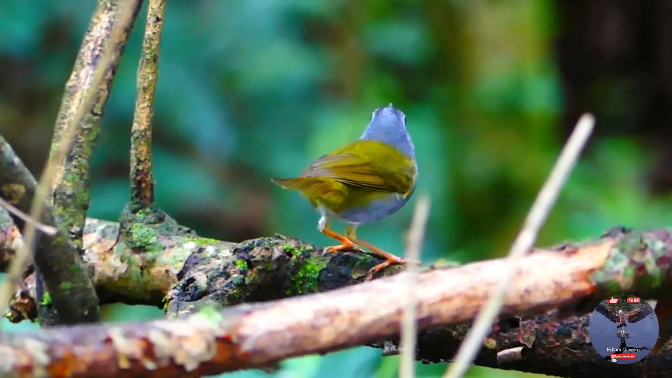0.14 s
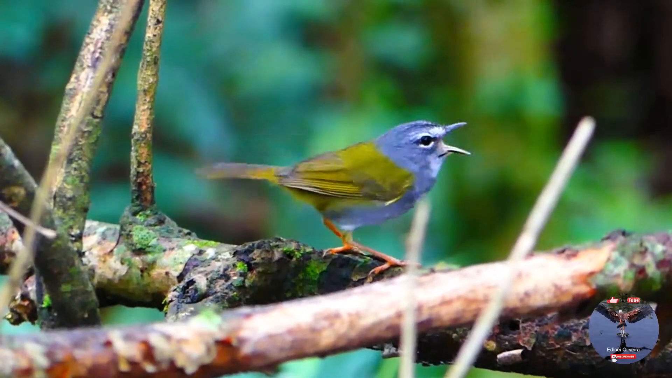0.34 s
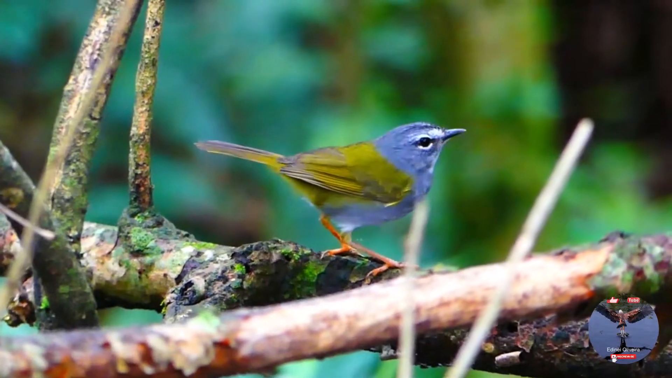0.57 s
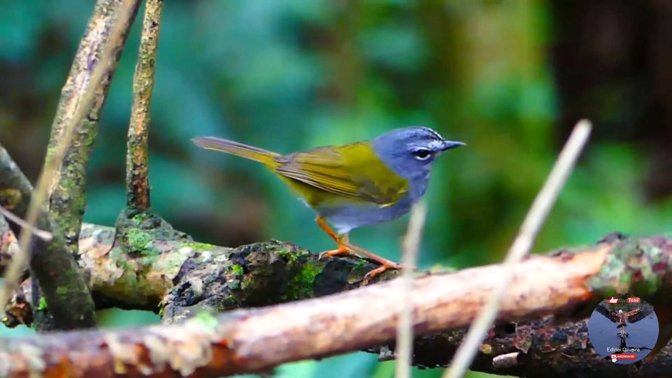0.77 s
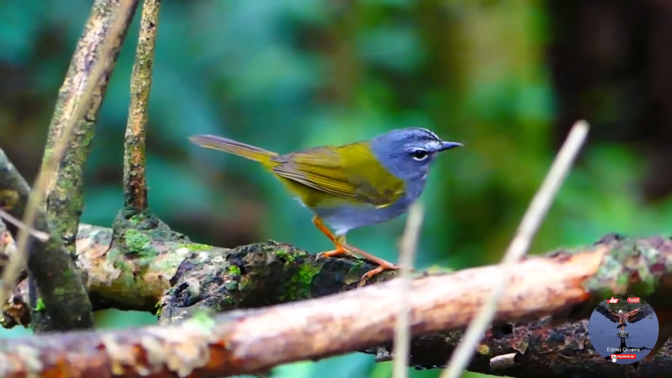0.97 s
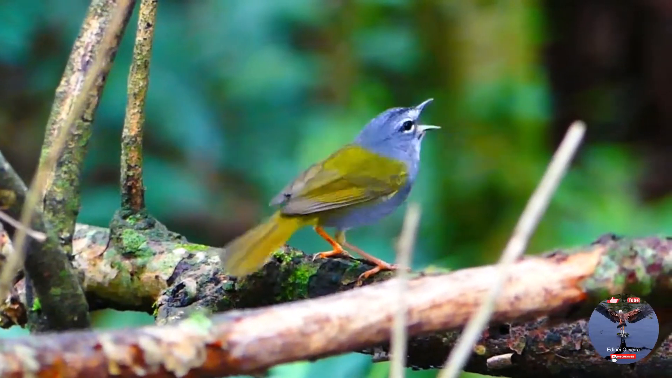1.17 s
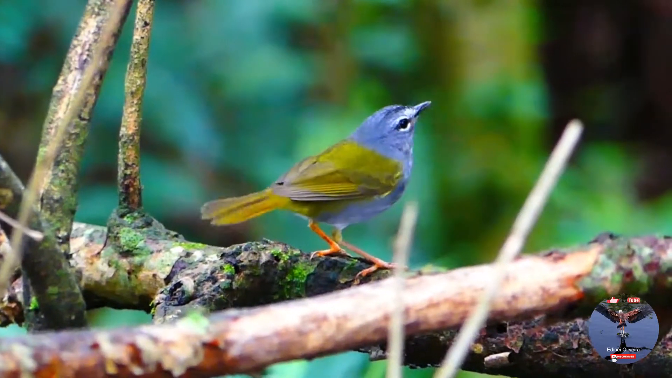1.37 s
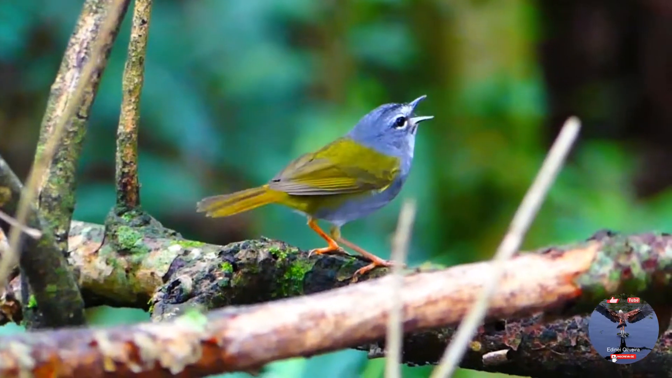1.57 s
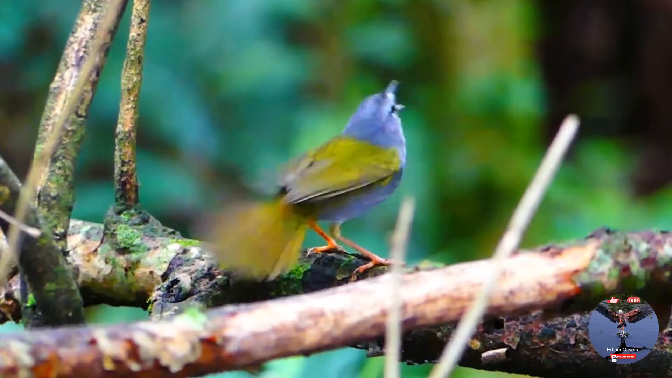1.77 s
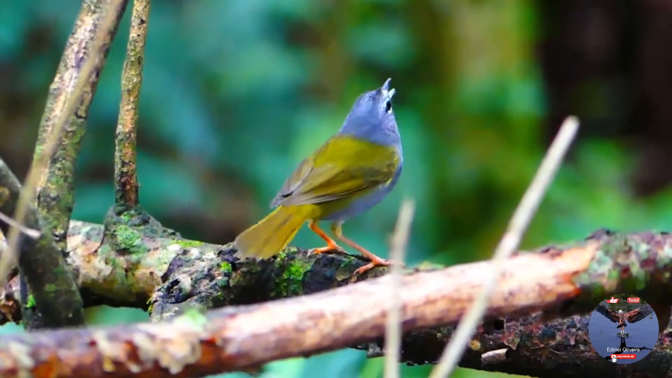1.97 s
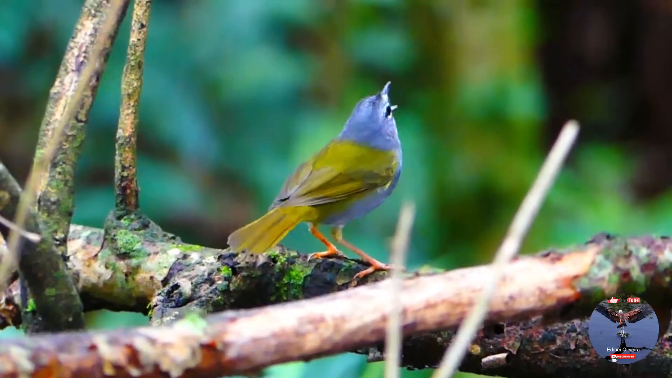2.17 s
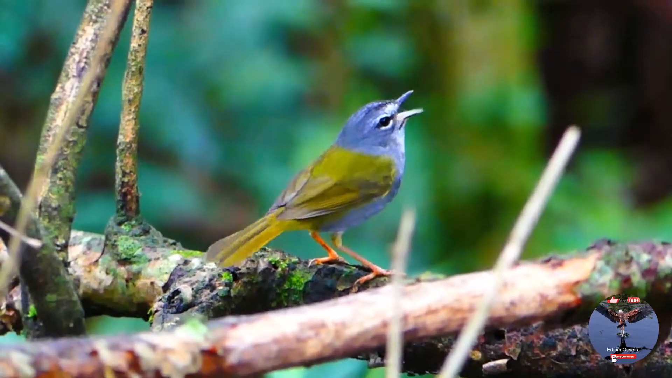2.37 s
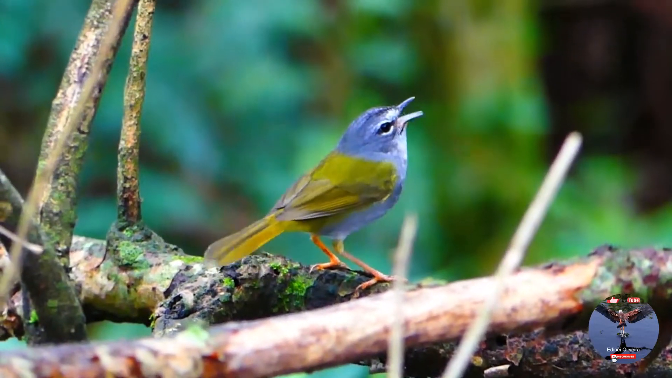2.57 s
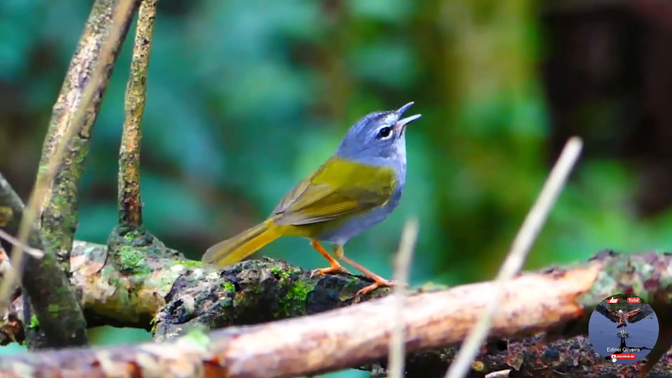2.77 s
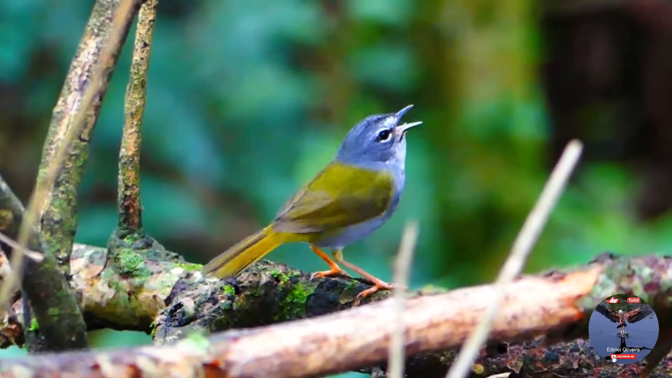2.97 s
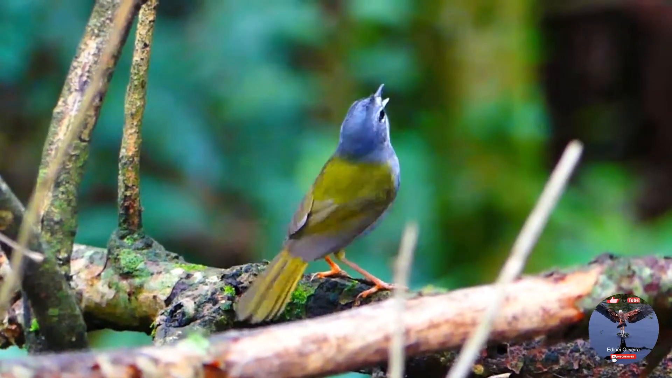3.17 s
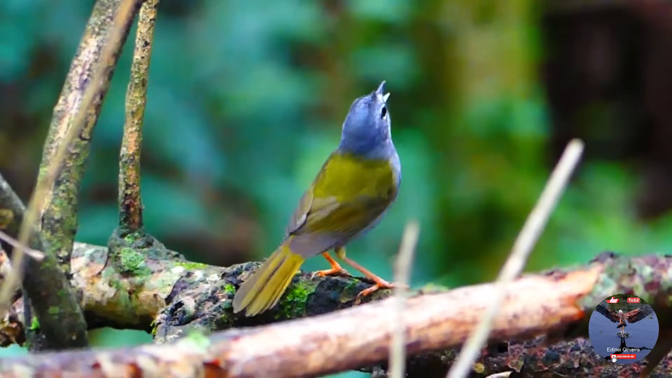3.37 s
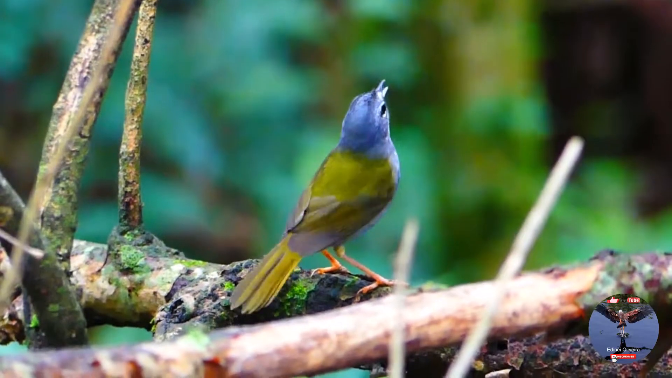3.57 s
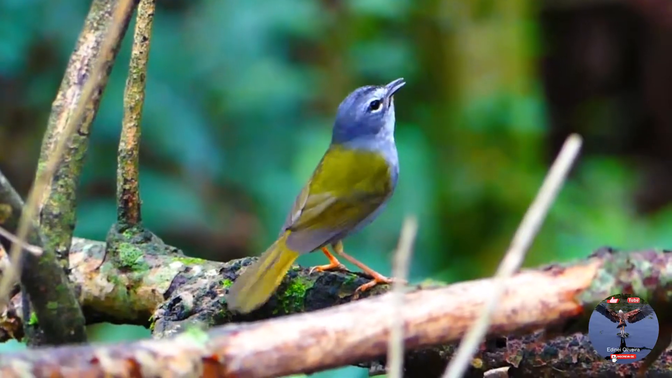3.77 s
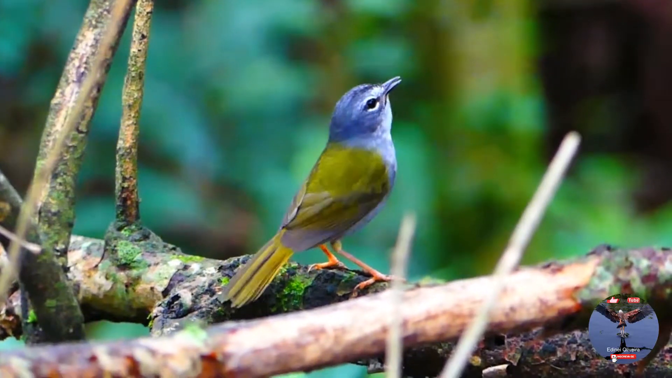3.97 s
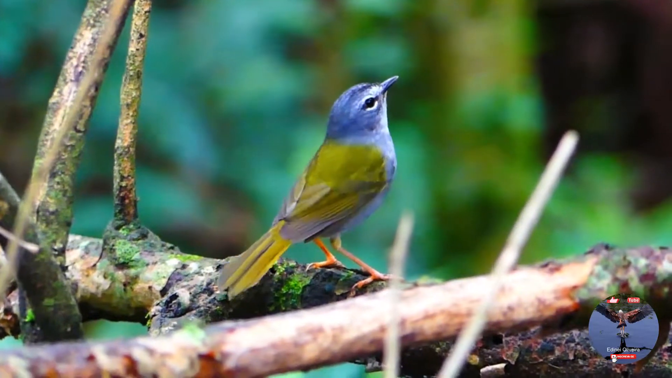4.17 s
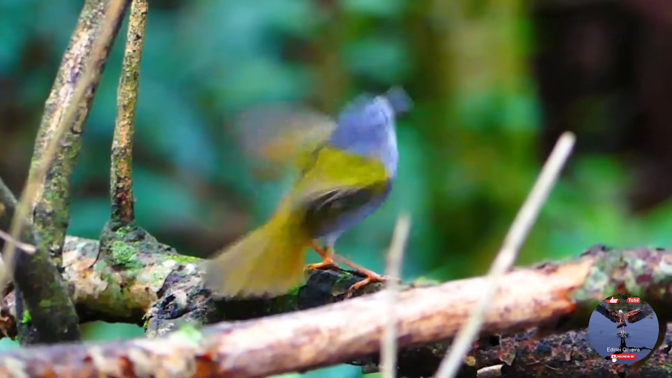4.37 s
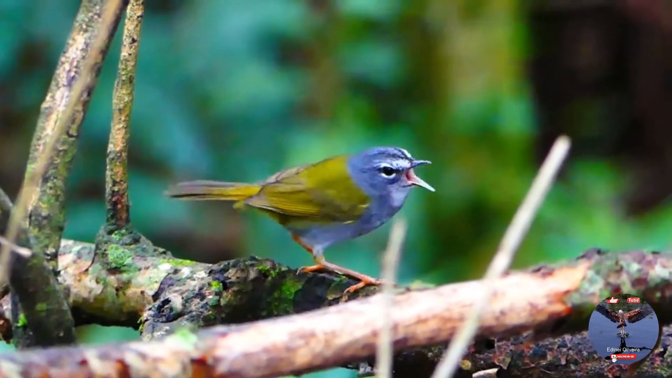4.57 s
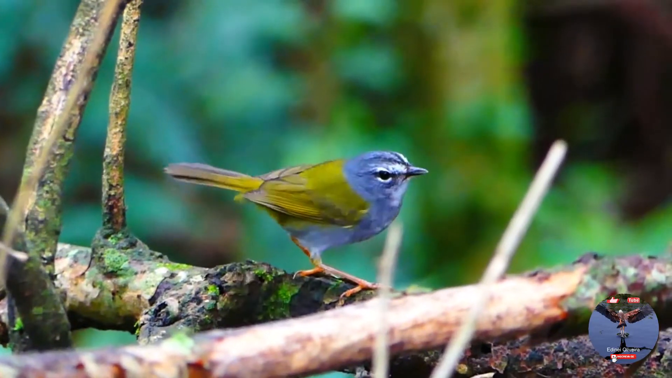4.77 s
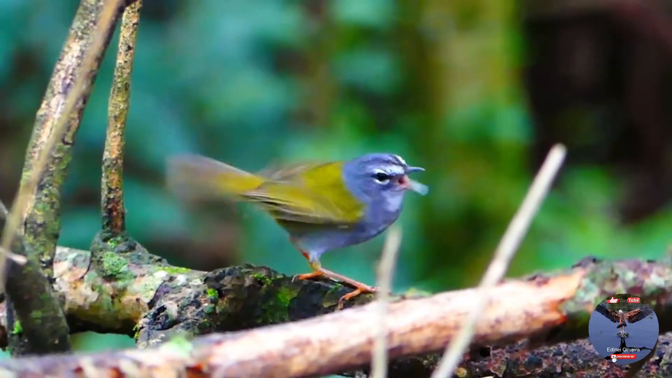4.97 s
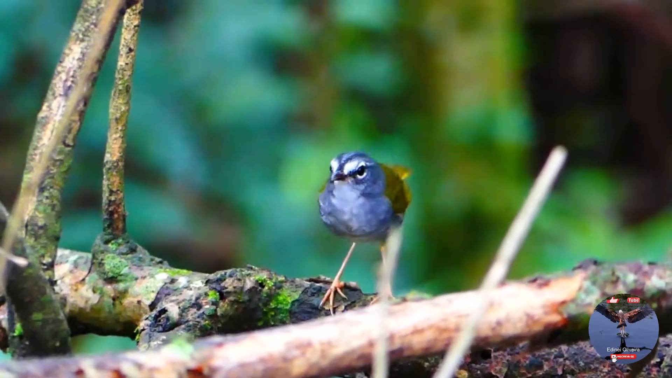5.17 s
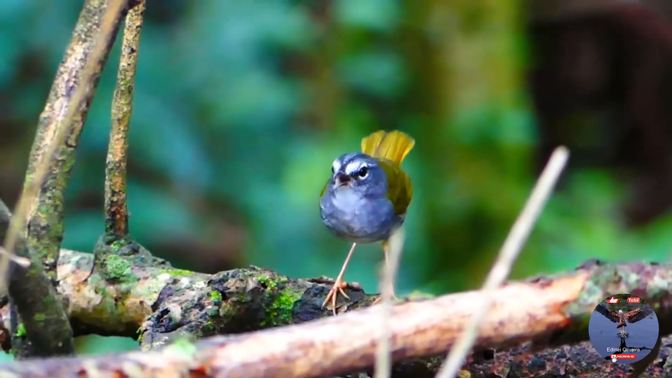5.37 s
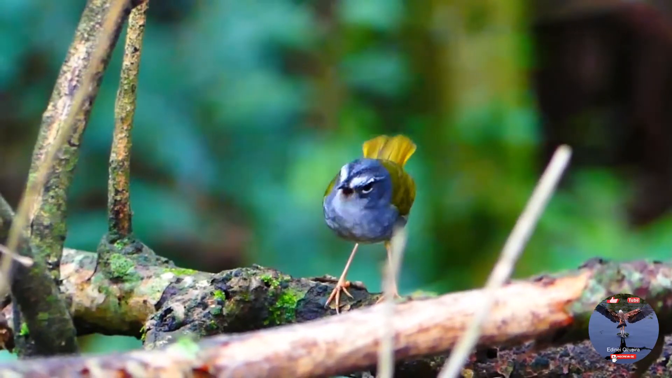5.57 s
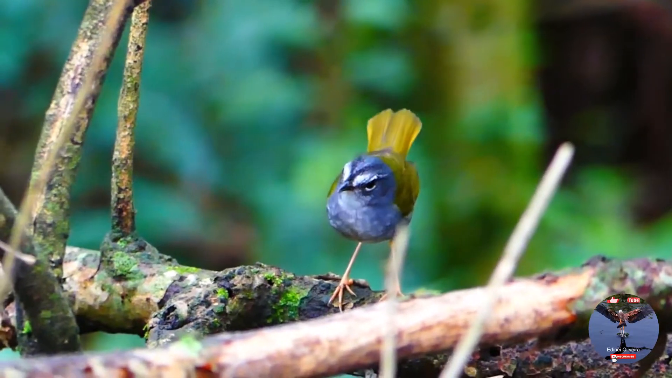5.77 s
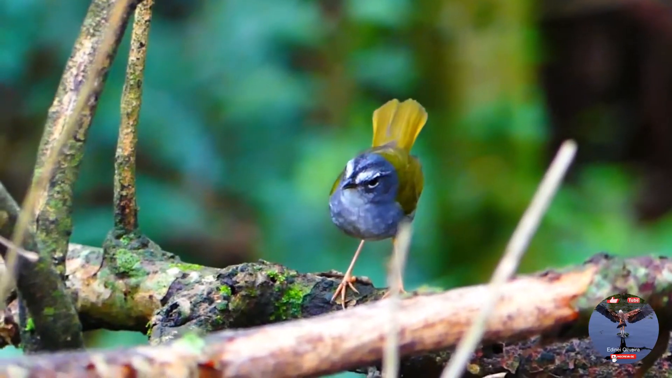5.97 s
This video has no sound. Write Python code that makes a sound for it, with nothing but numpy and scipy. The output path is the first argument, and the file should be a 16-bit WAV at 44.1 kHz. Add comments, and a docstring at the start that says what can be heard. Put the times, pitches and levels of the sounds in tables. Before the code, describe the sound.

A small bird sings close by in a dense forest, nearly mono, with a quick leafy echo and faint steady hiss. At 0.3 and 1.2 seconds it gives piercing chips, each a rough fast upward sweep that overshoots and settles on a thin, very high held note. From 1.5 it sings clear, almost pure whistles: one gliding up, a high one sliding down, then a run stepping lower, loudest around 2.4 to 3.1, slowing slightly and fading out on a lower downward slide by 4.1. Between 2.35 and 4.0 another bird adds harsh short ticks, and tiny twig clicks fall at 3.3 to 3.45. Sharp chips return at 4.65, 5.1 and 5.5. Throughout, two far doves coo low and soft, throbbing and blurred, most noticeable around 4 to 5.3. Barely audible high whistles come early; faint quick peeps dot the last 0.7 seconds.

```python
"""In a forest, a warbler on a branch gives sharp rising chips and a song of whistled notes that mostly step
down. Its whistles are gliding sines with overtones; doves coo far off as low sines that throb and blur. Other
small birds tick (bursts of noise) and peep (short sines), an insect blips (short sines), twigs crack and the
wood hisses (shaped noise). Trunks and leaves throw the birds, insect and twigs back as a dense echo. The sound
is nearly mono."""
import sys
import numpy as np
from scipy import signal
from scipy.fft import rfft, irfft, next_fast_len
from scipy.io import wavfile
from scipy.ndimage import uniform_filter1d, minimum_filter1d, map_coordinates

SR = 44100
rng = np.random.default_rng(int(sys.argv[2]) if len(sys.argv) > 2 else 0)


def log_audio(samples):
    """Write samples as a 16-bit WAV file to the path given in sys.argv[1]."""
    # one column per channel
    frames = np.atleast_2d(samples).T
    # limit to full scale, then quantise
    limited = np.clip(frames, -1, 1)
    pcm = np.round(limited * 32767).astype(np.int16)
    wavfile.write(sys.argv[1], SR, pcm)


N = 265967  # length of the scene in samples


def amp(db):
    """Turns decibels into a gain."""
    return 10 ** (np.asarray(db) / 20)


def unit(x):
    """Scales a sound to an average (rms) strength of 1."""
    return x / np.sqrt(np.mean(x ** 2) + 1e-20)


def wobble(rate):
    """A smooth random curve through `rate` random points a second."""
    points = rng.standard_normal(int(N * rate / SR) + 4)
    return map_coordinates(points, [np.arange(N) * rate / SR])


def filtered(x, response):
    """Makes each frequency of a sound stronger or weaker by response(hz)."""
    m = next_fast_len(N + 8192)
    gain = response(np.fft.rfftfreq(m, 1 / SR))
    return irfft(rfft(x, m) * gain, m)[..., :N]


def along(points, hz):
    """Reads a gain off a curve of (pitch_hz, level_db) points, on a log pitch axis."""
    f, db = np.transpose(points)
    return amp(np.interp(np.log(hz + 1), np.log(f + 1), db))


def add(out, start_s, x):
    """Mixes a sound in at start_s seconds."""
    part = out[round(start_s * SR):][:len(x)]
    part += x[:len(part)]


def edges(n, fade):
    """A soft start and end, each lasting `fade` seconds."""
    t = np.arange(n) / SR
    nearest_end = np.minimum(t, t[::-1])
    return np.sin(np.pi / 2 * np.clip(nearest_end / fade, 0, 1)) ** 2


# color of the wood's hiss, per Hz of bandwidth; only the shape counts: pitch_hz, relative_db
HISS_COLOR = [(24, -56.5), (60, -36.5), (110, -19), (230, -15.5), (330, -7), (600, -10.5), (1300, -10),
              (1550, -17), (2300, -14.5), (5000, -19), (6800, -21), (7600, -31), (10000, -25.5),
              (13000, -36.5), (15800, -34)]
# color of the hiss that differs between the ears, likewise: pitch_hz, relative_db
EAR_HISS_COLOR = [(24, -61.5), (40, -25), (362, -4), (1580, -12), (5530, -17), (7840, -16), (10100, -5.5),
                  (15800, -9.5)]


def hiss(color, patchy_db):
    """Colored noise of rms 1, with faint patches in time and pitch where it is stronger or weaker."""
    grid = signal.stft(rng.standard_normal(N), nperseg=512)[2]
    patches = uniform_filter1d(rng.standard_normal(grid.shape), 6, 0)  # smooth over pitch
    patches = uniform_filter1d(patches, 14, 1)  # smooth over time
    noise = signal.istft(grid * amp(patchy_db * unit(patches)), nperseg=512)[1][:N]
    return unit(filtered(noise, lambda hz: along(color, hz)))


# coos of the lower dove, level before throbbing: start_s, length_s, first_pitch_hz, last_pitch_hz, peak_db
LOW_COOS = [(.1, 0.76, 457, 449, -56), (.81, 0.29, 456, 472, -53.5), (1.34, 0.64, 475, 466, -55),
            (2.08, 0.29, 480, 480, -49.5), (2.6, 0.26, 495, 483, -54.5), (3.0, .35, 495, 485, -56),
            (3.5, 0.54, 459, 460, -49.5), (4.05, 1.31, 457, 449.7, -43), (5.41, 0.49, 448.6, 445, -49)]
# coos of the higher dove, same columns: start_s, length_s, first_pitch_hz, last_pitch_hz, peak_db
HIGH_COOS = [(.2, 0.99, 620, 595, -57.5), (1.72, .6, 640, 620, -65), (3.2, 0.29, 585, 597, -61),
             (3.65, 0.58, 595, 660, -58.5), (4.35, 1.0, 602, 598, -59), (5.42, 0.6, 600, 630, -59)]


def dove(rows, steady):
    """Soft low coos; over the distance many paths beat with the straight one, so they throb and blur."""
    swell_db, fade_s = 8, 0.018  # a coo is loudest in its middle
    coos = np.zeros(N, complex)
    for start_s, length_s, first_hz, last_hz, peak_db in rows:
        u = np.linspace(-1, 1, round(length_s * SR))  # -1 at the start, 1 at the end
        hz = np.interp(u, [-1, 1], [first_hz, last_hz])
        swell = amp(peak_db - swell_db * u ** 2) * edges(len(u), fade_s)
        add(coos, start_s, swell * np.exp(2j * np.pi * np.cumsum(hz) / SR))
    # the straight path plus randomly drifting ones
    paths = steady + wobble(30) + 1j * wobble(30)
    paths = paths / np.sqrt(np.mean(np.abs(paths) ** 2))
    return np.sqrt(2) * np.real(coos * paths)


# overtones of a held whistle against its lowest tone: pitch_hz, second_db, third_db, fourth_db
OVERTONE_LEVELS = [(3480, -36, -36.5, -34), (3830, -52, -57.5, -46.5), (4180, -42.5, -39.5, -51),
                   (5200, -44, -50.5, -60), (6040, -35.5, -62.5, -60.5), (7430, -23.5, -62, -63)]


def held_overtones(hz):
    """Overtone levels of a whistle at each pitch."""
    at, *levels = np.transpose(OVERTONE_LEVELS)
    return [np.interp(hz, at, db) for db in levels]


def whistle(hz, db, overtones_db):
    """The syrinx, a bird's voice organ: a sine of rms level db, with overtones from the second up."""
    phase = 2 * np.pi * (np.cumsum(hz) / SR + rng.random())
    tone = np.sin(phase)
    for k, level_db in enumerate(overtones_db, 2):
        tone = tone + amp(level_db) * np.sin(k * phase) * (k * hz < SR / 2)
    return np.sqrt(2) * amp(db) * tone


# chips, rms levels before the echo mix:
# start_s, rise_s, top_pitch_hz, held_pitch_hz, settling_s, length_s, sweep_db, held_db, waver_hz
CHIP_CALLS = [(0.333, 0.029, 9000, 7358, 0.027, .15, -24.5, -26.5, 22),
              (1.175, 0.026, 8930, 7116, 0.017, 0.15, -30.5, -20.5, 22.8),
              (4.648, 0.032, 8820, 7297, 0.026, 0.15, -24.5, -25, 30),
              (5.077, 0.026, 8990, 7270, 0.02, 0.13, -23.5, -23.5, 130.6),
              (5.507, 0.027, 9020, 7243, .025, .15, -24, -25, 34.4)]
# a chip's start: time_in_rises, share_of_climb, db_against_sweep, octave_db, roughness_db
CHIP_SWEEP = [(0, 0.08, -28.5, 9, 9), (.1, 0.0027, -27.5, 13, -2.5), (.25, 0.35, -7.5, -10.5, 3.5),
              (.43, .69, 2.5, -21, 4), (.75, .93, -9, -21.5, 7), (1, 0.93, -18, -23, 4.5)]


def chips():
    """A rough sweep up, led by its octave, overshoots and settles on a held note."""
    base_hz = 2697  # where the climb is counted from
    out, waver, rasp, jitter = np.zeros(N), wobble(45), wobble(700), wobble(900)
    at, climb, shape_db, octave_db, rough_db = np.transpose(CHIP_SWEEP)
    for start_s, rise_s, top_hz, held_hz, settle_s, length_s, sweep_db, held_db, waver_hz in CHIP_CALLS:
        t = np.arange(round(length_s * SR)) / SR
        now = slice(round(start_s * SR), round(start_s * SR) + len(t))
        u = t / rise_s  # 1 at the end of the rise
        # the unsettled syrinx jumps about in pitch
        grit_hz = 260 * jitter[now] * np.interp(u, [1, 1.8], [1, 0])
        share = uniform_filter1d(np.interp(u, at, climb), size=150, mode="nearest")
        up = base_hz + (top_hz - base_hz) * share
        down = held_hz + (top_hz - held_hz) / np.cosh(1.9 * (t - rise_s) / settle_s)
        down = down + waver_hz * waver[now]
        hz = np.where(u < 1, up, down) + grit_hz
        # after the turn the level moves to that of the held note, which clears
        db = np.interp(u, [*at, 2.2, 3.5], [*(sweep_db + shape_db), held_db, held_db])
        db = db + np.interp(u, [*at, 2.2], [*rough_db, .7]) * rasp[now]
        second_db = np.interp(u, [*at, 1.6], [*octave_db, held_overtones(held_hz)[0]])
        chip = whistle(hz, db, [second_db, second_db - 18])
        add(out, start_s, edges(len(t), fade=0.0018) * chip)
    return out


# harsh ticks of another bird; each fades over twice length_s, and level_db is before that fade:
# start_s, center_hz, width_hz, length_s, level_db
TICK_CALLS = [(2.352, 6400, 890, 0.023, -35), (2.573, 5380, 696, 0.068, -33.5),
              (2.829, 4760, 706, .02, -39), (2.913, 5220, 1480, 0.021, -37),
              (3.13, 5070, 910, 0.016, -35.5), (3.352, 4660, 1076, 0.023, -32),
              (3.995, 4240, 900, 0.016, -44)]
# faint far whistles, then from 5.33 s an insect's short blips, level before the echo mix: start_s, pitch_hz,
# length_s, level_db
PEEP_CALLS = [(.5, 6850, .2, -66), (.95, 6850, .13, -66), (3.18, 6850, .12, -66), (5.33, 5450, .018, -53),
              (5.445, 5450, .018, -53), (5.68, 5450, .015, -56), (5.793, 5450, .018, -54),
              (5.922, 5450, .016, -54)]


def neighbours():
    """Ticks are fading bursts of noise around one pitch; peeps and the insect's blips are plain short tones."""
    out = np.zeros(N)
    for start_s, hz, width_hz, length_s, db in TICK_CALLS:
        t = np.arange(round(2 * length_s * SR)) / SR
        f = np.fft.rfftfreq(len(t), 1 / SR)
        band = np.exp(-((f - hz) / width_hz) ** 2)
        burst = unit(irfft(rfft(rng.standard_normal(len(t))) * band, len(t)))
        add(out, start_s, amp(db) * burst * np.exp(-2 * t / length_s) * edges(len(t), fade=0.00054))
    for start_s, hz, length_s, db in PEEP_CALLS:
        t = np.arange(round(length_s * SR)) / SR
        tone = np.sqrt(2) * np.sin(2 * np.pi * hz * t)
        add(out, start_s, amp(db) * tone * edges(len(t), fade=0.0039))
    return out


# song notes, rms level before flutter and the echo mix:
# start_s, length_s, first_pitch_hz, last_pitch_hz, glide_s, loudest_after_s, peak_db
SONG_NOTES = [(1.527, 0.082, 5400, 5270, .03, .04, -35), (1.572, 0.18, 5220, 6050, 0.039, .07, -21),
              (1.832, 0.21, 7370, 6114, .055, .11, -18.5), (2.099, 0.079, 7480, 7240, .016, .03, -21),
              (2.223, 0.14, 6070, 6110, 0.041, 0.058, -18.5), (2.383, .12, 6030, 5952, 0.16, 0.066, -15.5),
              (2.533, .13, 5388, 5265, 0.12, .065, -15.5), (2.695, 0.071, 5298, 5250, .1, 0.03, -12.5),
              (2.803, 0.055, 5210, 5100, 0.11, 0.025, -16.5), (2.909, 0.045, 5060, 5000, .1, .022, -15.5),
              (2.991, .17, 4916, 4530, .066, .07, -12.5), (3.228, 0.091, 4388, 4307, 0.067, .042, -15),
              (3.422, .135, 4250, 4112, .065, 0.032, -16), (3.6, 0.081, 3942, 3843, .1, 0.033, -14),
              (3.735, 0.1, 3818, 3680, .05, .075, -20), (3.91, .215, 3720, 3410, .12, .165, -24)]


def song():
    """Each note glides to its last pitch, swells and wanes, slightly unsteady."""
    attack_s, release_s = 0.014, 0.014  # the breath opens and closes
    attack_db, release_db = 21.5, 15.5  # how far the level moves in those moments
    swell_db, wane_db = 6.5, 7.5  # from the attack up to the peak, from the peak down to the release
    knee = 1.6  # over 1: an even glide that then levels off
    out, waver, flutter, grit = np.zeros(N), wobble(60), wobble(70), wobble(150)
    for start_s, length_s, first_hz, last_hz, glide_s, loudest_s, peak_db in SONG_NOTES:
        t = np.arange(round(length_s * SR)) / SR
        now = slice(round(start_s * SR), round(start_s * SR) + len(t))
        glided = 1 - np.exp(-(t / glide_s) ** knee)
        glided = glided / (1 - np.exp(-(length_s / glide_s) ** knee))  # 1 at the end of the note
        loudest_s = np.clip(loudest_s, attack_s, length_s - release_s)
        times = [0, attack_s, loudest_s, length_s - release_s, length_s]
        below_peak = [swell_db + attack_db, swell_db, 0, wane_db, wane_db + release_db]
        db = peak_db - np.interp(t, times, below_peak)
        # a weakly blown syrinx is unsteady
        weak = np.clip((-21.5 - db) / 12, 0, 1)
        hz = first_hz + (last_hz - first_hz) * glided
        hz = hz + 15 * waver[now] + 80 * weak * grit[now]
        level_db = db + (0.66 + 2.7 * weak) * flutter[now]
        note = whistle(hz, level_db, held_overtones(hz))
        add(out, start_s, edges(len(t), fade=0.0022) * note)
    return out


# twigs clicking, level before the treble cut and the echo mix: start_s, level_db, treble_cut_hz
TWIG_CLICKS = [(3.291, -40, 5000), (3.423, -45, 15000), (3.438, -37, 6000), (3.449, -38, 5500)]


def twigs():
    """Each click is a very short crack of noise, dull or bright."""
    t60_s = .004  # time to fade by 60 dB
    out, t = np.zeros(N), np.arange(SR // 100) / SR
    for start_s, db, top_hz in TWIG_CLICKS:
        crack = amp(db - 60 * t / t60_s) * rng.standard_normal(len(t))
        b, a = signal.butter(2, top_hz, fs=SR)
        add(out, start_s, signal.lfilter(b, a, crack))
    return out


# single reflections off the branch, the ground and a near trunk: delay_s, level_db
NEAR_BOUNCES = [(.002, -19.5), (.0076, -10.5), (.013, -10)]


def bounces(x):
    """Delayed, softer copies from the nearest surfaces."""
    return sum(amp(db) * np.pad(x, (round(delay_s * SR), 0))[:N] for delay_s, db in NEAR_BOUNCES)


# dense echo of the foliage, then of far trunks: level_db, time_to_fade_60_db_s
ECHO_LAYERS = [(-3, 0.23), (-10.5, 0.7)]


def forest(x):
    """Scattered echo as fading noise; a fresh random tail is drawn for each .2 s, crossfaded."""
    hop = SR // 5
    t = np.arange(SR) / SR
    window = np.hanning(2 * hop + 1)[:-1]  # neighboring stretches crossfade
    padded = np.pad(x, (hop, 2 * hop))
    echo = np.zeros(len(padded) + SR)
    for k in range(0, N + hop, hop):
        tail = np.zeros(SR)
        for db, t60_s in ECHO_LAYERS:
            layer = rng.standard_normal(SR) * amp(-60 * t / t60_s) * (1 - np.exp(-t / 0.00064))
            tail += amp(db) * layer / np.linalg.norm(layer)
        add(echo, k / SR, signal.fftconvolve(padded[k:k + 2 * hop] * window, tail))
    return echo[hop:hop + N]


# gain of the treble blur that differs between the ears: pitch_hz, level_db
BLUR_GAIN = [(3000, -73), (7000, -56.5), (8500, -8.5), (13000, -1.5), (15800, -5.5)]


def treble_blur(x):
    """A faint noisy treble blur that follows the birds and twigs, opposite in the two ears."""
    smeared = forest(x)  # the same random smearing, drawn anew
    return filtered(smeared, lambda hz: along(BLUR_GAIN, hz))


def scene():
    """Birds and twigs in their echo, with far doves, over the hiss."""
    direct_db, hiss_db, ear_hiss_db = -3, -48, -63
    birds = chips() + neighbours() + song() + twigs()
    mid = amp(direct_db) * birds + bounces(birds) + forest(birds)
    mid = mid + dove(LOW_COOS, steady=1.2) + dove(HIGH_COOS, steady=.6)
    mid = mid + amp(hiss_db) * hiss(HISS_COLOR, patchy_db=2.5)
    # what is added in one ear and taken away in the other
    side = amp(ear_hiss_db) * hiss(EAR_HISS_COLOR, patchy_db=2.5) + treble_blur(birds)
    return np.array([mid + side, mid - side])


def record(dry):
    """A limiter holds down the loudest swells, then everything from top_hz up is cut away."""
    limit_db, top_hz = -9, 15800
    needed = np.minimum(1, amp(limit_db) / (np.abs(dry).max(axis=0) + 1e-9))
    gain = uniform_filter1d(minimum_filter1d(needed, size=400), size=300)
    return filtered(dry * gain, lambda hz: hz < top_hz)


dry = scene()
out = record(dry)
log_audio(out)
```